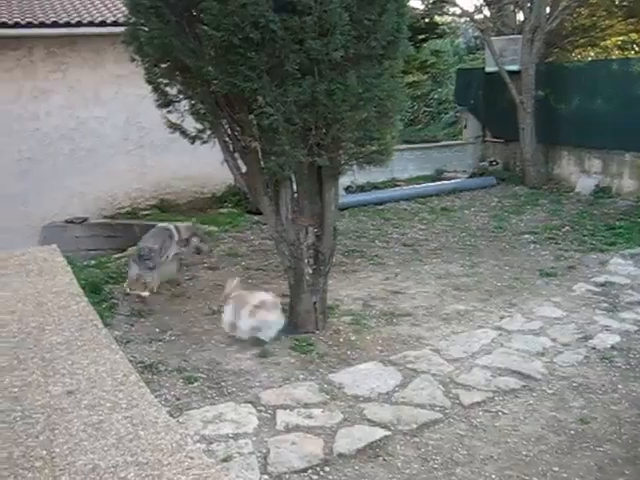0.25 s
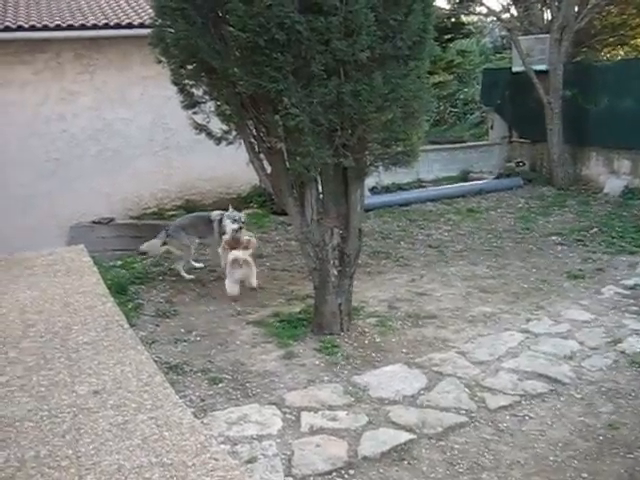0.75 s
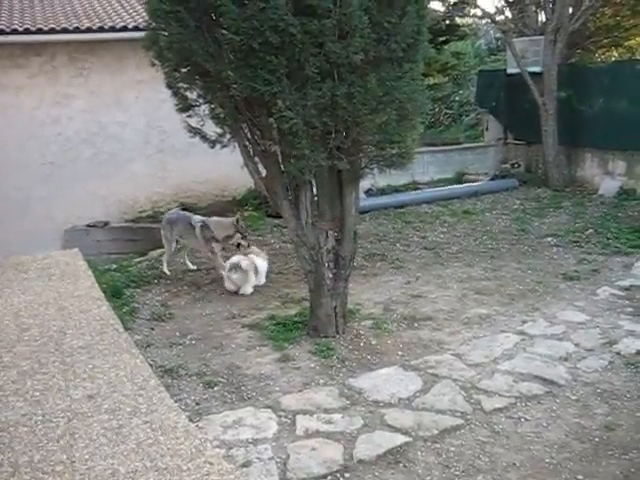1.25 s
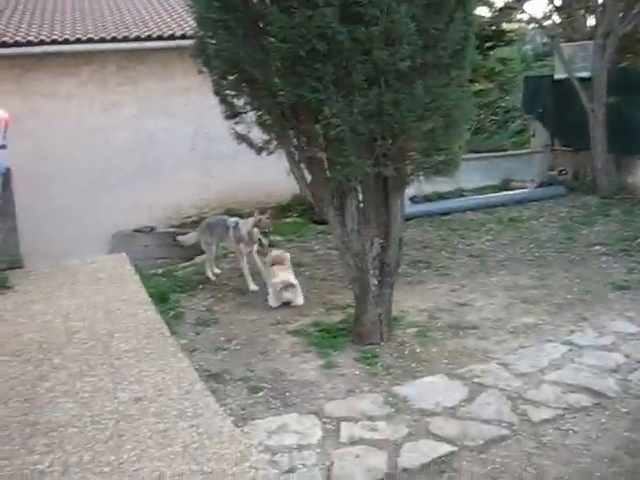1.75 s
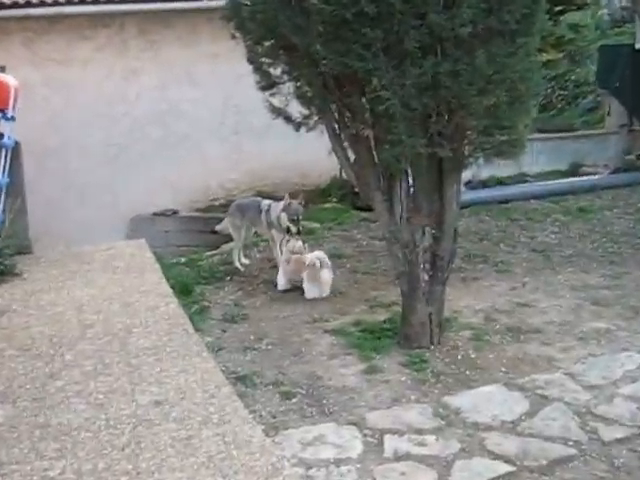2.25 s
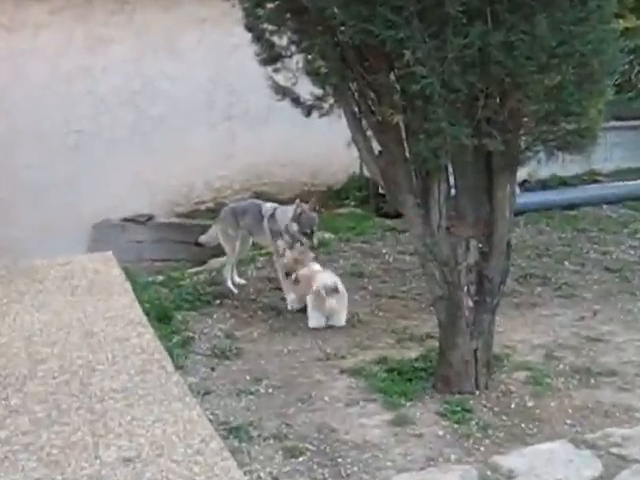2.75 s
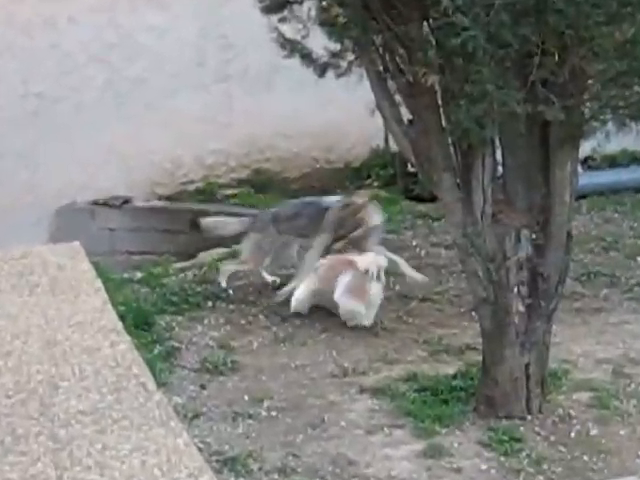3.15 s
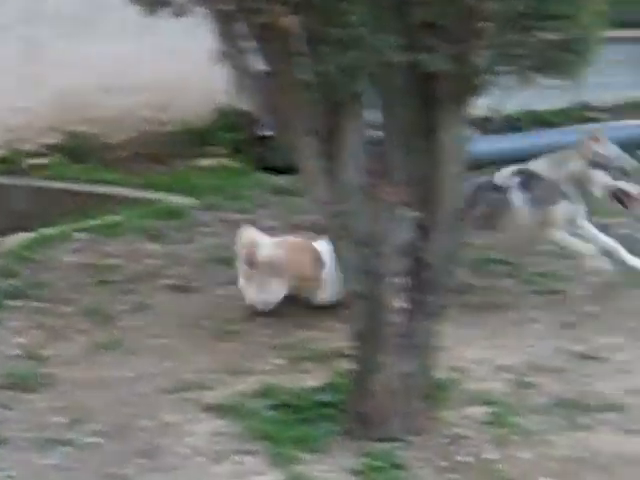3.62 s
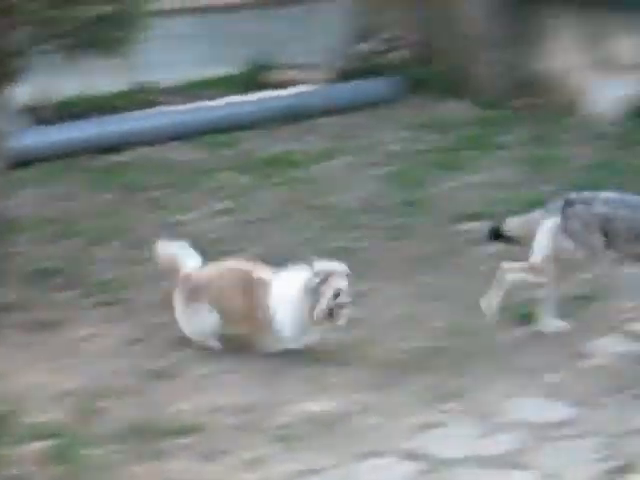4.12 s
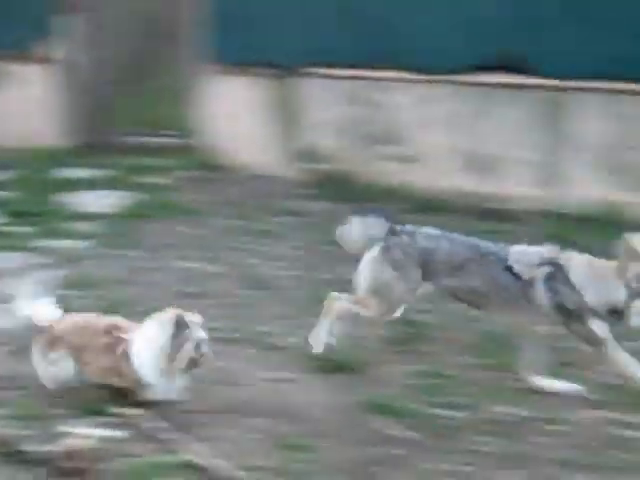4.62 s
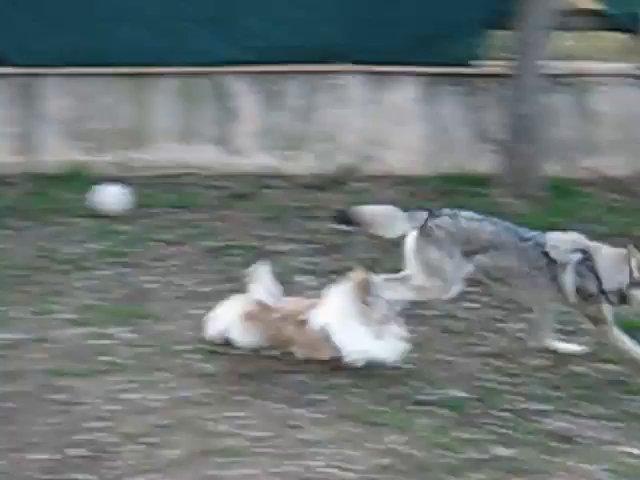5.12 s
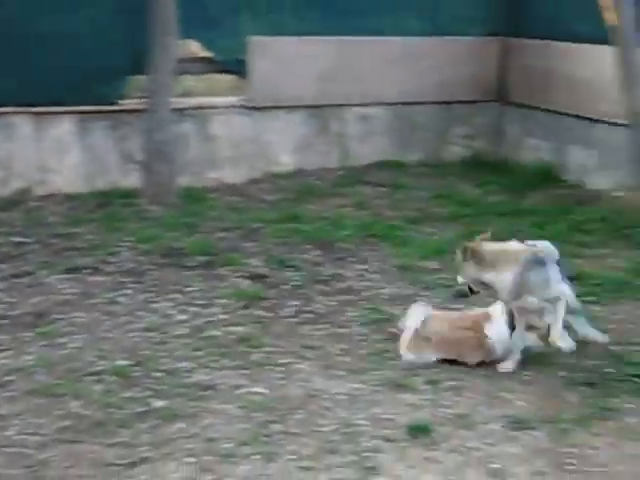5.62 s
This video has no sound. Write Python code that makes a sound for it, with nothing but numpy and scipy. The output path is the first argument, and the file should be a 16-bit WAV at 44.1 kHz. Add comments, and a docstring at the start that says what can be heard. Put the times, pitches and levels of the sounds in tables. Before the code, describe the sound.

A small dog gives sharp, hoarse yaps while play-fighting in a walled yard, amid loud handling knocks, wind rumble and a few gruff barks near the end.

```python
"""Two dogs play-fight in a walled yard: rough yaps and growls, some metres from a hand-held camera.
Vocal fold pulses and noisy puffs excite gliding throat resonances; wall echoes and a diffuse tail follow.
Bursts of filtered noise make panting and hissing; sparse grains of noise make soft scuffs and rustles.
Fingers ring the modes of the camera case and thud its microphone, over air, wind and a low hum.
A gain control drops at once when the sound is loud and recovers steadily."""
import sys
import numpy as np
from scipy import signal
from scipy.fft import rfft, irfft
from scipy.io import wavfile
from scipy.ndimage import uniform_filter1d

SR = 44100
rng = np.random.default_rng(int(sys.argv[2]) if len(sys.argv) > 2 else 0)


def persist_wave(psi):
    """Save psi, clipped to +-1, as 16-bit WAV."""
    counts = np.round(np.clip(psi, -1, 1) * 32767).astype(np.int16)
    wavfile.write(sys.argv[1], SR, np.atleast_2d(counts).T)


N = 259308
T = np.arange(N) / SR
EDGE_HZ = 6500  # upper band limit of the voices and of the microphone chain

YAP_RELEASE_S, JAW_CLOSE_S = 0.013, 0.035
LEAP_FROM, LEAP_S = 0.6, 0.014  # the pitch leaps up from this share, with this time constant
PITCH_SAG_PER_S, LIPS_SAG_PER_S = 0.6, 0.99  # shares lost per second, about mid-call
ONSET_ROUGH, BRIGHTEN_DB = 0.17, 8.5  # hoarse until the pitch has leapt; brighter towards the end
FADE_POWER = 2.1  # a yap holds its strength at first, then changes ever faster, mostly fading
# Yaps: start_s (full strength), attack_s, length_s, effort_db, fade_db (change by the end),
# pitch_hz (mid-call, after the leap), roughness (0-1), open_jaw_hz, closed_jaw_hz, start_tongue_hz,
# end_tongue_hz, lips_hz and brightness_db (both mid-call)
YAPS = [(.867, .005, 0.078, -2, -3, 479.5, 0.67, 1168, 905, 1353, 1245, 3170, -8),
        (0.994, .008, 0.03, -15, -11.5, 488.3, .62, 1030, 1000, 1640, 1550, 3000, -2),
        (1.722, .006, .091, -11, 2.5, 540.3, 0.61, 1127, 920, 1830, 1340, 3070, -7.5),
        (2.722, 0.0029, 0.13, -1, -18.5, 524.6, 0.65, 1080, 987, 1410, 1620, 3050, 0),
        (3.357, .007, .146, -11.5, -20, 528, .64, 1470, 945, 1660, 1800, 3040, -1),
        (5.705, .003, 0.1, -6, -4.5, 475.2, 0.51, 1220, 857, 1450, 1390, 2780, -8.5)]


def yap(s, attack, length, effort_db, fade_db, pitch_hz, rough, open_hz, closed_hz,
        tongue0_hz, tongue1_hz, lips_hz, bright_db):
    """Source-filter voice: pitch leaps up, then pitch, jaw and lips sink; the tongue glides up or down."""
    lead, t, gain = envelope(attack, length, YAP_RELEASE_S)
    along = t / length
    from_middle = t - length / 2
    low = np.exp(-t / LEAP_S)
    hz = pitch_hz * (1 - (1 - LEAP_FROM) * low) * (1 - PITCH_SAG_PER_S * from_middle)
    jaw = closed_hz + (open_hz - closed_hz) * np.exp(-t / JAW_CLOSE_S)
    tongue = glide(tongue0_hz, tongue1_hz, along)
    lips = lips_hz * (1 - LIPS_SAG_PER_S * from_middle)
    effort = effort_db + fade_db * along ** FADE_POWER
    brightness = bright_db + BRIGHTEN_DB * (along - 0.5)
    return s - lead, gain * bark(effort, hz, rough + ONSET_ROUGH * low, jaw, tongue, lips, brightness)


GROWL_ATTACK_S, GROWL_RELEASE_S = 0.0025, 0.0091  # attack at 0 dB effort
SOFTER_PER_DB = 0.035  # exponential rate at which the attack lengthens per dB less effort
LIPS_RISE = 0.12  # share of its mid-call value by which the lip resonance climbs
# Growls and gruff barks: start_s (full strength), length_s, effort_db, swell_db (change by the end),
# start_pitch_hz, end_pitch_hz, roughness (clipped to 0-1), start_jaw_hz, end_jaw_hz, start_tongue_hz,
# end_tongue_hz, lips_hz (mid-call), start_brightness_db, end_brightness_db
GROWLS = [(.254, .074, -25, -13, 197.3, 218.4, 0.88, 282, 570, 700, 1600, 2010, -14, 6.5),
          (.775, .055, -32, 17, 302, 350.6, 0.83, 920, 1050, 1250, 1320, 2680, -40, -24.5),
          (0.837, 0.053, -28, 10.5, 287.4, 298, 1.03, 1010, 1135, 1360, 1400, 3900, -10, 7),
          (1.599, 0.14, -44, 18, 362, 368, .7, 725, 770, 1480, 1680, 2350, -15, -11),
          (3.249, .105, -38, 16.5, 295.2, 323.4, 0.46, 430, 985, 1404, 1600, 2500, -26, 2),
          (5.222, .114, -3.5, -3, 266.2, 402, .45, 730, 790, 1560, 1334, 2620, 2.5, -4.5),
          (5.537, 0.099, 1, -7, 275.3, 320, 0.6, 835, 920, 1880, 1230, 2750, -7, 0.5),
          (5.638, 0.045, -9, 4, 319.4, 362, 0.53, 974, 1048, 1340, 1340, 2970, -11, -22)]


def growl(s, length, effort_db, swell_db, start_hz, end_hz, rough, jaw0_hz, jaw1_hz,
          tongue0_hz, tongue1_hz, lips_hz, bright0_db, bright1_db):
    """Source-filter voice: a low rough pitch climbs steadily while the jaw opens."""
    attack = GROWL_ATTACK_S * np.exp(-SOFTER_PER_DB * effort_db)
    lead, t, gain = envelope(attack, length, GROWL_RELEASE_S)
    along = t / length
    hz = glide(start_hz, end_hz, along)
    jaw = glide(jaw0_hz, jaw1_hz, along)
    tongue = glide(tongue0_hz, tongue1_hz, along)
    lips = lips_hz * (1 + LIPS_RISE * (along - 0.5))
    brightness = glide(bright0_db, bright1_db, along)
    return s - lead, gain * bark(effort_db + swell_db * along, hz, rough, jaw, tongue, lips, brightness)


CHEST_FADE_S = 0.031  # the chest booms only at the start of a call
MUZZLE_SAG = 0.12  # share by which the muzzle resonances sink over a call
FUNDAMENTAL_DB = -27  # clean tone at the pitch, at 0 dB effort
PURER_PER_DB = 0.33  # dB by which that tone stands out more for each dB less effort
# Upper resonances of the muzzle: centre_hz (mid-call), width_hz (of each filter stage), level_db (relative)
MUZZLE = [(2046, 950, -11), (3540, 310, -14), (4230, 530, -32)]


def bark(effort_db, hz, rough, first, second, third, bright_db,
         jitter=0.03, half_share=0.54, chest_hz=265):
    """Source and filter: unsteady vocal fold pulses and puffs of air excite the throat resonances."""
    rough, n = np.clip(rough, 0, 1), len(hz)
    turns = np.cumsum(hz * (1 + 2 * jitter * rough * wander(n, hz=129.3))) / SR
    harmonics = (np.cos(2 * np.pi * k * turns) * (k * hz < EDGE_HZ) for k in range(1, 24))
    folds = sum(harmonics) * np.sqrt(4 * hz / SR)
    folds *= 1 + 2 * half_share * rough * np.cos(np.pi * turns)  # strong and weak pulses alternate
    puffs = evened((0.26 + np.exp(-(turns % 1) / 0.11)) * rng.standard_normal(n))
    drive = (1 - rough) * folds + 0.5 * rough * puffs

    jaw = resonate(drive, first, 290)
    tongue = resonate(drive, second, 560)
    lips = resonate(drive, third, 500)
    # the chest carries the fundamental while the pitch is still low
    chest = amp(-2.5) * np.minimum(chest_hz / hz, 1) ** 3 * resonate(drive, chest_hz, 330)
    chest *= rough * np.exp(-T[:n] / CHEST_FADE_S)
    sink = 1 + MUZZLE_SAG * np.linspace(0.5, -0.5, n)
    muzzle = amp(-8) * lips
    muzzle += sum(amp(db) * resonate(drive, f * sink, width) for f, width, db in MUZZLE)
    hiss = amp(-24.5) * rough ** 2 * resonate(puffs, 3890, 2700)  # air past the teeth, more when hoarse

    voice = chest + jaw + amp(-6.5) * tongue + amp(bright_db) * (muzzle + hiss)
    voice /= np.sqrt(abs(uniform_filter1d(voice ** 2, size=700)) + 1e-12)  # level out before the effort
    voice += amp(FUNDAMENTAL_DB - PURER_PER_DB * effort_db) * np.cos(2 * np.pi * turns)
    rasp = amp(3.5 * rough * wander(n, hz=90))
    return amp(effort_db) * voice * rasp


def envelope(attack, length, release):
    """Exponential growth, hold and release: lead time, time since full strength, and gain."""
    t = np.arange(-4 * attack, length, 1 / SR)
    onset = np.exp(np.minimum(t, 0) / attack)
    ending = np.sin(np.pi / 2 * np.minimum((length - t) / release, 1)) ** 2
    return -t[0], np.maximum(t, 0), onset * ending


# A thin whine: start_s, length_s, level_db (peak, before the flutter), pitch_hz
WHINES = [(1.516, 0.19, -35.5, 714)]


def whine(s, length, db, hz, waver=0.041, flutter_db=3):
    """Frequency and amplitude modulation: a nearly pure, slightly unsteady tone through the nose."""
    n = round(length * SR)
    tone = np.sin(2 * np.pi * np.cumsum(hz * (1 + waver * wander(n, hz=80))) / SR)
    flutter = amp(db + flutter_db * wander(n, hz=60))
    return s, flutter * tone * signal.windows.tukey(n, 0.2)


# Air past the teeth in the hardest barks: peak_s, length_s, level_db (rms before the fades), centre_hz
HISSES = [(.868, .06, -29, 4150), (2.727, .025, -28, 5000), (3.352, .06, -35, 4400), (5.28, .15, -32, 4650),
          (5.59, .09, -30, 3700), (5.725, .06, -30, 3650)]


def teeth_hiss(s, length, db, hz, width_hz=1900):
    """Turbulence: a short rush of air through the teeth makes band-shaped noise."""
    air = rng.standard_normal(round(length * SR))
    return s - length / 2, amp(db) * evened(resonate(air, hz, width_hz)) * np.hanning(len(air))


# Panting of the dogs: peak_s, length_s, level_db (rms before the fades), mouth_hz
PANTS = [(0.038, 0.091, -35, 2190), (2.323, 0.14, -41.5, 3220), (4.391, 0.05, -42, 2490),
         (4.65, 0.073, -37, 2260), (4.912, .03, -28.5, 2140), (4.944, 0.062, -27, 2090),
         (5.439, 0.051, -34, 2030)]


def pant(s, length, db, hz):
    """Turbulence and resonance: a puff of noisy air passes through an open muzzle."""
    air = rng.standard_normal(round(length * SR))
    mouth = resonate(air, hz, 800)
    mouth += amp(-9.5) * resonate(air, 3550, 1100)
    mouth += amp(-11.5) * resonate(air, 4500, 800)
    mouth += amp(-10) * resonate(air, 1300, 540)
    return s - length / 2, amp(db) * evened(mouth) * np.hanning(len(air))


# Soft, dull scuffs and rustles in the yard, some perhaps of paws:
# peak_s, length_s, level_db (rms before the fades), centre_hz
SCUFFS = [(.078, .06, -42, 3800), (.297, 0.041, -33.5, 3900), (0.299, 0.078, -37.5, 189.6),
          (0.619, 0.021, -32.5, 1035), (.67, 0.13, -38.5, 475), (2.29, 0.12, -37, 822),
          (4.103, 0.0054, -36.5, 1350), (4.383, 0.16, -47, 786), (5.078, 0.027, -37, 1190),
          (5.079, 0.037, -41.5, 4150), (5.44, .077, -40, 4000), (5.526, 0.008, -31.5, 4600)]
# Fingers sliding on the camera: peak_s, length_s, level_db (rms before the fades), centre_hz
RUBS = [(1.197, 0.15, -34, 223), (1.336, 0.082, -34, 225), (1.438, 0.019, -29, 3270),
        (1.449, 0.024, -24.5, 430), (1.506, 0.028, -23, 580), (1.799, 0.044, -13, 420),
        (4.186, .04, -32, 3260)]


def scuff(s, length, db, hz):
    """Stick-slip friction: two rough surfaces slide in a quick cloud of tiny slips."""
    n = round(length * SR)
    grains = rng.standard_normal(n) * (rng.random(n) < 2500 / SR)  # about 2500 slips per second
    return s - length / 2, amp(db) * evened(resonate(grains, hz, 0.69 * hz)) * np.hanning(n)


# Dogs moving about the walled yard, driest in the last barks:
# time_s, tail_db, delay_factor (on the wall echoes)
PLACE = [(0.897, -6.5, 1.075), (1.749, -7, 1.48), (2.753, -10.5, 0.97), (3.4, -4, 0.9), (5.249, -12, 1.15),
         (5.751, -12, 0.74)]
# Wall echoes: delay_s (before the delay factor), gain (relative to the direct sound)
WALLS = [(.0048, 0.06), (.0085, -0.14), (0.013, 0.38), (.023, -0.16), (.034, -.2), (.062, -0.056)]
# Decay of the diffuse tail: frequency_hz, t60_s
YARD_DECAY = [(200, 1), (1000, 0.45), (3000, 0.47), (6000, 0.45)]


def yard(x):
    """Reflection and reverberation: wall echoes shift as the dogs move, and a tail dies band by band."""
    s, *columns = np.transpose(PLACE)
    tail_db, stretch = (np.interp(T, s, column) for column in columns)
    early = x + sum(gain * np.interp(T - delay * stretch, T, x, left=0) for delay, gain in WALLS)
    early /= np.sqrt(1 + sum(gain ** 2 for _, gain in WALLS))
    taps = rng.standard_normal(SR) * (rng.random(SR) < 2500 / SR) * (T[:SR] > 0.008)
    hz, t, z = signal.stft(taps, SR, nperseg=256)
    decay = amp(-60 * t / read(YARD_DECAY, hz)[:, None])
    tail = signal.istft(z * decay, SR, nperseg=256)[1]
    return early + signal.fftconvolve(x * amp(tail_db), tail / np.linalg.norm(tail))[:N]


# Fingers knocking on the camera: start_s, click_db (peak), click_colour_hz, thud_db, thud_hz
KNOCKS = [(0.778, -46, 300, -15.5, 48), (1.4156, 0, 2240, -32, 59), (1.4375, -2.5, 3280, -10, 93),
          (1.4401, -3, 1140, -18, 44.7), (1.5073, 3, 865, -11.5, 38.6), (1.685, -0.5, 402, -14.5, 92.5),
          (1.783, 1.5, 304, -30, 98.4), (1.8, -3.5, 520, -11, 46), (1.8062, 8, 700, -2.5, 58),
          (1.9736, -11.5, 2000, -19, 61.4), (2.9629, -12, 402, -11, 117.5), (3.365, 0, 432, -39, 142),
          (4.1435, -5.5, 1230, -19.5, 50), (4.171, -11, 1480, -32, 70), (4.1813, -12.5, 1940, -31, 89),
          (4.1911, -5, 874, -12.5, 128.5), (4.207, -9, 2090, -19, 69.4)]
# Modes of the camera case: frequency_hz, level_db (relative), t60_s
CASE = [(250, 17.5, 0.0052), (545, -11.5, 0.0039), (1156, -27.5, 0.015), (1330, -22.5, 0.02),
        (1757, -7, 0.012), (2850, 2, 0.0036), (3650, 20.5, 0.0049), (4590, 29.5, 0.0028), (5730, -19, .003)]


def knock(s, click_db, colour_hz, thud_db, thud_hz, octaves=0.4, thud_cycles=0.3,
          contact_cycles=0.57, rub_db=-24):
    """Modal excitation: a hard contact rings high case modes, a soft one low; a push thuds the microphone."""
    t = np.arange(SR // 10) / SR
    ring = np.zeros(len(t))
    for hz, db, t60 in CASE:
        reach = 1 + (np.log2(hz / colour_hz) / octaves) ** 4  # modes far from the colour stay weak
        ring += amp(db - 60 * t / t60) * np.sin(2 * np.pi * hz * t) / reach
    force = np.sin(np.pi * np.minimum(t * colour_hz / contact_cycles, 1)) ** 2  # softer lasts longer
    rub = amp(rub_db) * rng.standard_normal(len(t)) * np.exp(-t / 0.0047)  # the skin slides a little
    ring = signal.fftconvolve(ring, force + rub)[:len(t)]
    swell = t * thud_hz / thud_cycles
    thud = np.sin(2 * np.pi * thud_hz * t) * swell * np.exp(1 - swell)
    return s, amp(click_db) * ring / abs(ring).max() + amp(thud_db) * thud


# Light ticks of the camera case: start_s, click_db (peak)
TICKS = [(0.0817, -18.5), (.4852, -6), (0.4901, -12), (.597, -15), (.688, -19), (4.791, -19)]


def tick(s, db):
    """Modal excitation: a light, hard touch rings the upper case modes with little thud."""
    return knock(s, db, colour_hz=4600, thud_db=db - 29, thud_hz=120)


WIND_DB = -35.5  # between gusts, before the lumpiness
HUM_DB, HUM_HZ = -49.5, 91.5  # rms of the fundamental between swells, and its mean pitch
# Spectrum of the outdoor air: frequency_hz, level_db (relative, per Hz)
AIR_COLOUR = [(60, -21.5), (150, -4), (300, 0), (450, -3.5), (700, -5), (1000, -8), (1800, -11.5),
              (3000, -13.5), (4800, -17), (5700, -26), (6600, -35), (8000, -65)]
# Loudness of the outdoor air: time_s, level_db
AIR_LEVEL = [(0, -37.5), (2.1, -41), (4.4, -42.5), (5.88, -35.5)]
# Spectrum of the wind on the microphone: frequency_hz, level_db (relative, per Hz)
WIND_COLOUR = [(10, 6.5), (30, 4.5), (60, 0.5), (120, -5.5), (250, -18.5), (600, -83.5), (2000, -75)]
# Gusts of wind: peak_s, half_length_s, rise_db
GUSTS = [(.15, .28, 6), (0.76, .09, 5.5), (1.464, 0.22, 14), (3.528, 0.066, 9), (4.006, .1, 0.5),
         (5.13, 0.099, 10)]
# Swells of the low hum: peak_s, half_length_s, rise_db
HUM_SWELLS = [(4.05, 0.69, 10.5), (5.003, 0.35, 9.5)]


def background(gust_db=3):
    """Shaped noise and slow modulation: outdoor air, lumpy wind on the microphone and a wavering hum."""
    air = level(AIR_LEVEL) * noise(AIR_COLOUR)
    lumps = amp(gust_db * noise([(1, -10), (10, -2.5), (30, -20), (100, -100)]))  # (Hz, dB)
    wind = swelling(WIND_DB, GUSTS) * noise(WIND_COLOUR) * lumps
    phase = 2 * np.pi * np.cumsum(HUM_HZ * (1 + 0.015 * wander(N, hz=7.1))) / SR
    hum_tone = np.sqrt(2) * (np.sin(phase) + amp(-15) * np.sin(3 * phase))
    return air + wind + swelling(HUM_DB, HUM_SWELLS) * hum_tone


def swelling(base_db, swells):
    """Level modulation: bell-shaped swells on a steady level, as a gain for every sample."""
    return amp(base_db + sum(db * np.exp(-((T - s) / half) ** 2) for s, half, db in swells))


def amp(db):
    """Level to amplitude ratio: 20 dB is a factor of ten."""
    return 10 ** (np.asarray(db) / 20)


def evened(x):
    """Power normalisation to rms 1."""
    return x / np.sqrt(np.mean(x ** 2) + 1e-20)


def glide(start, end, along):
    """Linear glide from start to end as along runs from 0 to 1."""
    return start + (end - start) * along


def read(points, hz):
    """Spectral interpolation on a log-frequency axis."""
    f, value = np.transpose(points)
    return np.interp(np.log(hz + 1), np.log(f + 1), value)


def level(curve):
    """Level interpolation: points of (s, dB) become a gain for every sample."""
    return amp(np.interp(T, *np.transpose(curve)))


def noise(colour):
    """Spectral shaping: white noise takes on the given spectrum, at rms 1."""
    spectrum = rfft(rng.standard_normal(N))
    return evened(irfft(spectrum * amp(read(colour, np.fft.rfftfreq(N, 1 / SR))), N))


def wander(size, hz):
    """Low-passed noise: one second of random drift, rms 1 and no faster than about hz, repeated to size."""
    f = np.fft.rfftfreq(SR, 1 / SR)
    drift = irfft(rfft(rng.standard_normal(SR)) * np.exp(-(f / hz) ** 2), SR)
    return np.resize(evened(drift), size)


def resonate(x, hz, width):
    """Resonance by heterodyning: shift hz to zero, low-pass in three stages, and shift back."""
    turn = np.exp(2j * np.pi * np.cumsum(hz * np.ones(len(x))) / SR)
    r = np.exp(-np.pi * width / SR)
    slow = x / turn + 1e-18
    for _ in range(3):
        slow = signal.lfilter([1 - r], [1, -r], slow)
    return 2 * (turn * slow).real


def add(mix, s, sound):
    """Superposition: lays a sound into the mix at time s."""
    part = mix[max(round(s * SR), 0):][:len(sound)]
    part += sound[:len(part)]


def play(source, table):
    """Superposition of the events in every row of a table."""
    mix = np.zeros(N)
    for row in table:
        add(mix, *source(*row))
    return mix


def scene():
    """Superposition: the dogs in the yard, the hand on the camera and the open air."""
    voices = play(yap, YAPS) + play(growl, GROWLS) + play(whine, WHINES) + play(teeth_hiss, HISSES)
    in_yard = voices + play(pant, PANTS) + play(scuff, SCUFFS)
    hand = play(knock, KNOCKS) + play(tick, TICKS) + play(scuff, RUBS)
    return (yard(in_yard) + hand + background())[None]


def record(dry, limit_db=-12.5, recovery_db_per_s=55):
    """Dynamic compression: gain falls at once, recovers steadily; peaks are rounded, then band-limited."""
    power_db = 10 * np.log10(abs(uniform_filter1d(dry[0] ** 2, size=500)) + 1e-12)
    fall = T * recovery_db_per_s
    held_db = np.maximum.accumulate(power_db + fall) - fall
    over_db = np.maximum(held_db - limit_db, 0)
    ducked = dry / amp(uniform_filter1d(over_db, size=100))
    rounded = ducked / (1 + (ducked / 0.8) ** 4) ** 0.25
    low_pass = signal.firwin(151, EDGE_HZ, window=("kaiser", 9), fs=SR)
    return signal.oaconvolve(rounded, low_pass[None], "same")


dry = scene()
out = record(dry)
persist_wave(out)
```